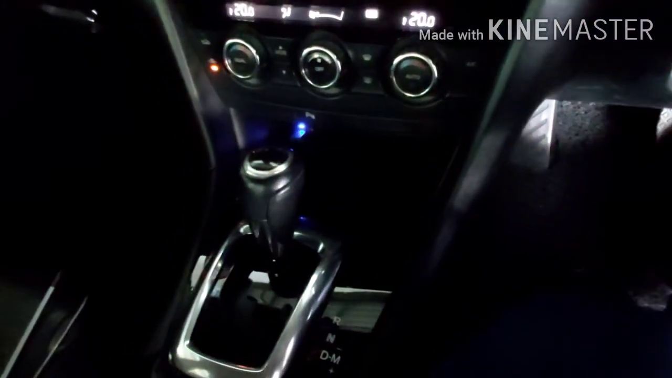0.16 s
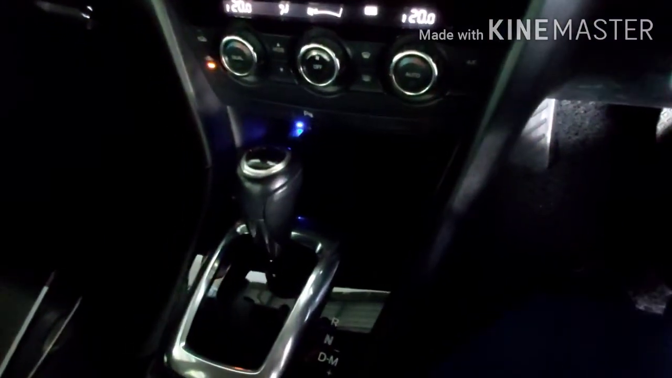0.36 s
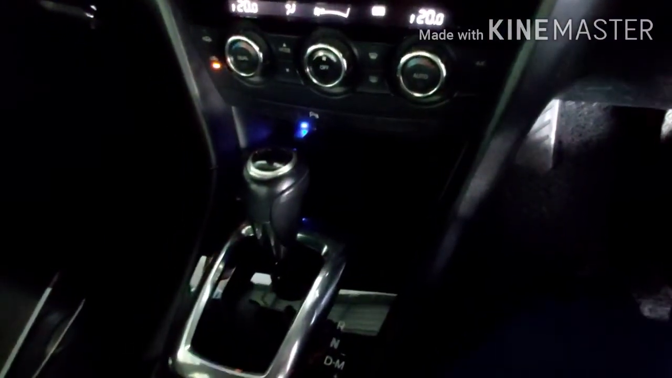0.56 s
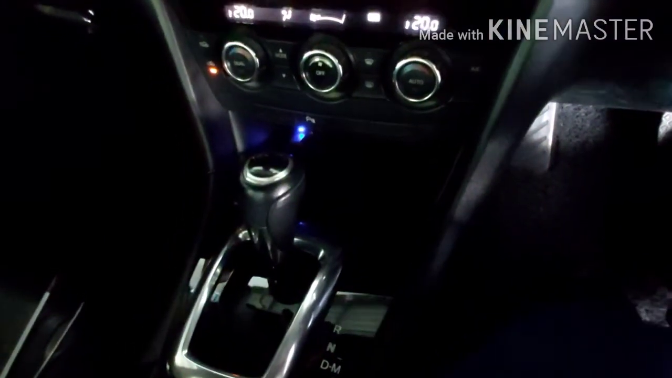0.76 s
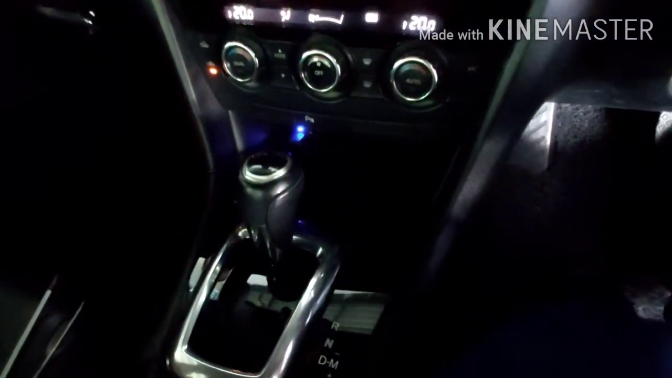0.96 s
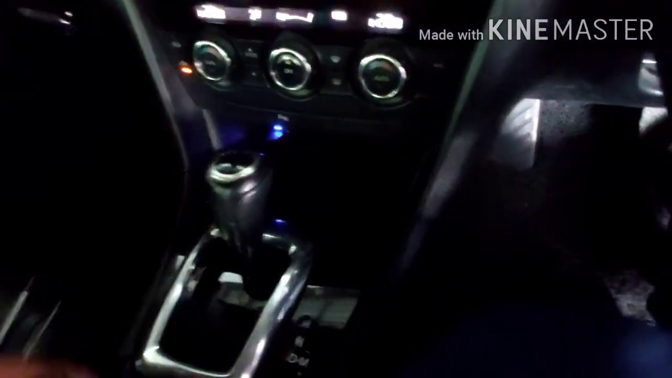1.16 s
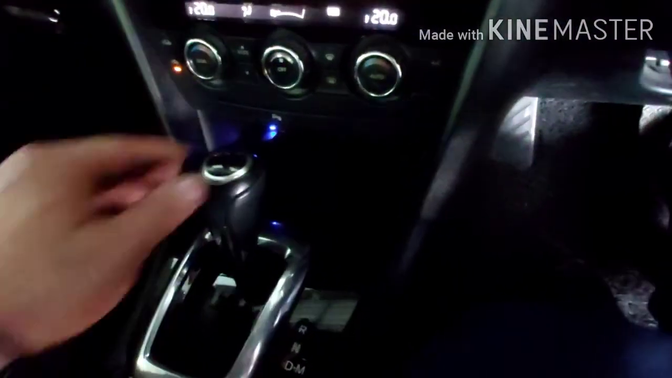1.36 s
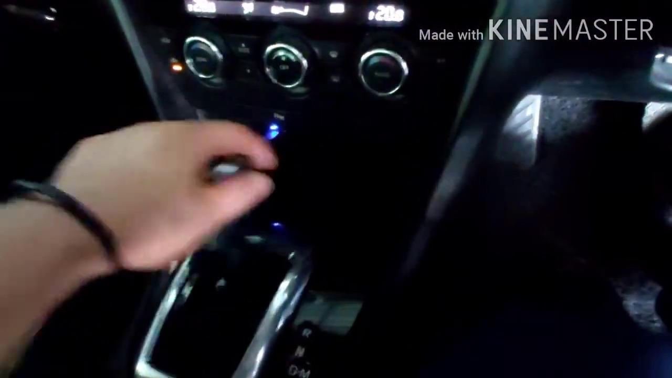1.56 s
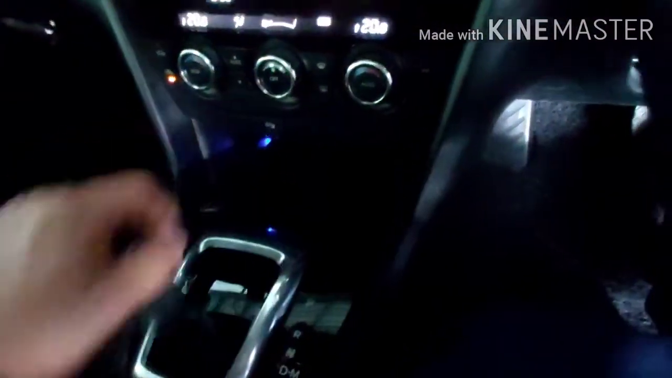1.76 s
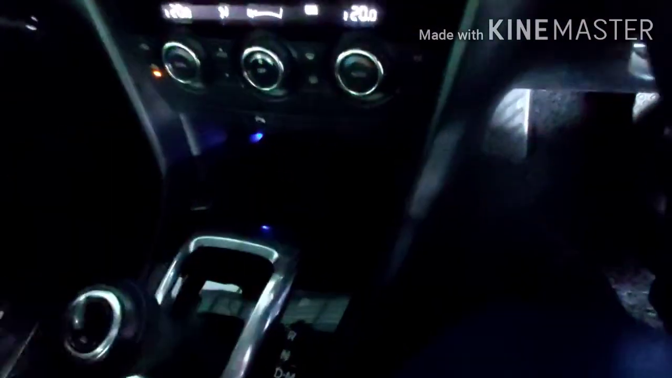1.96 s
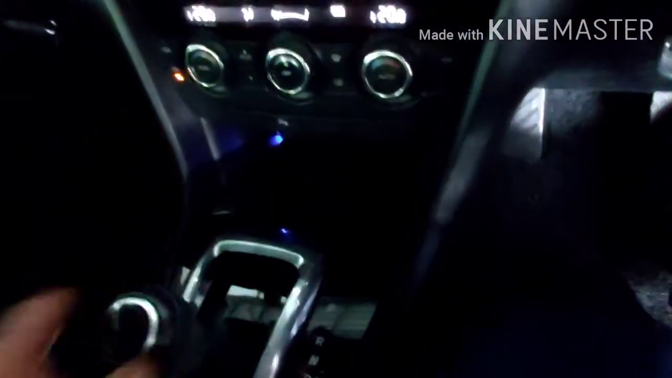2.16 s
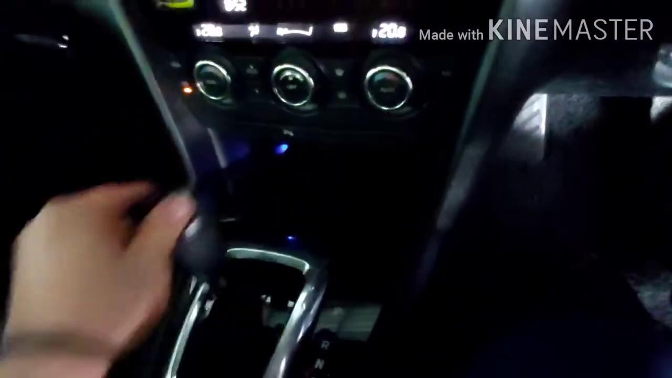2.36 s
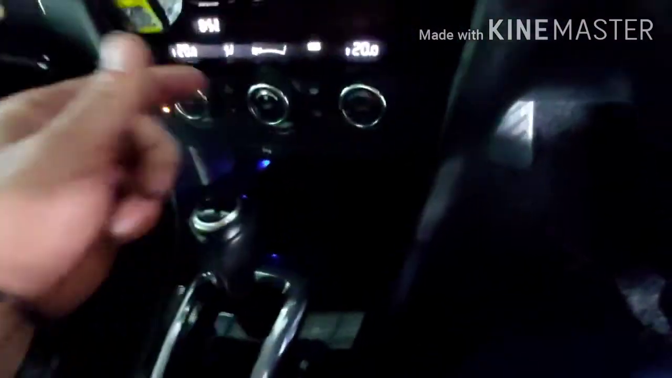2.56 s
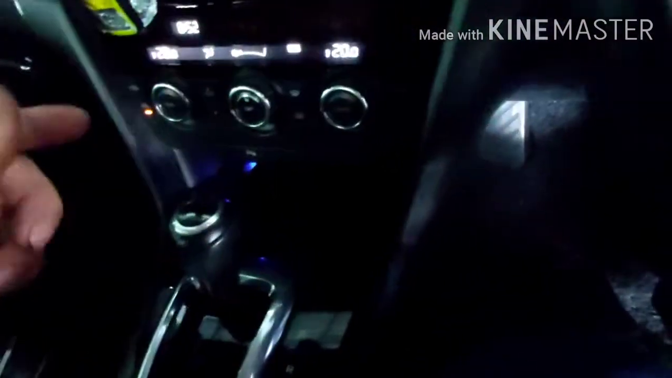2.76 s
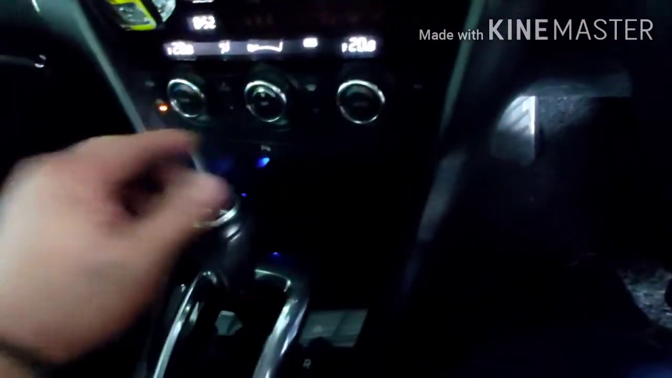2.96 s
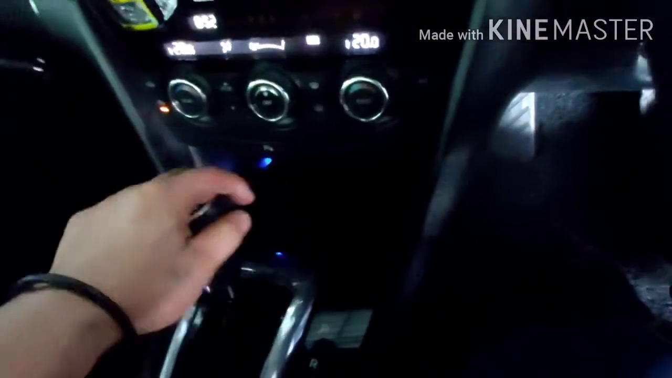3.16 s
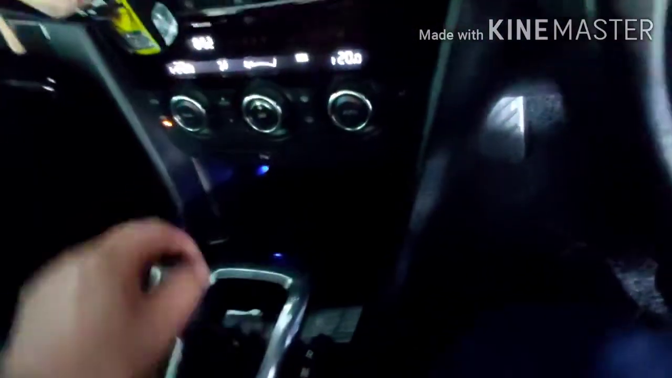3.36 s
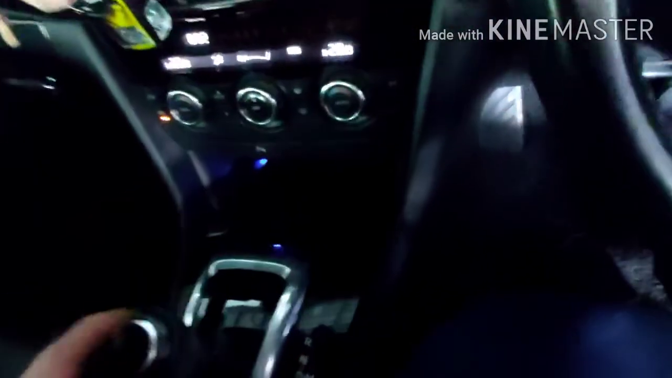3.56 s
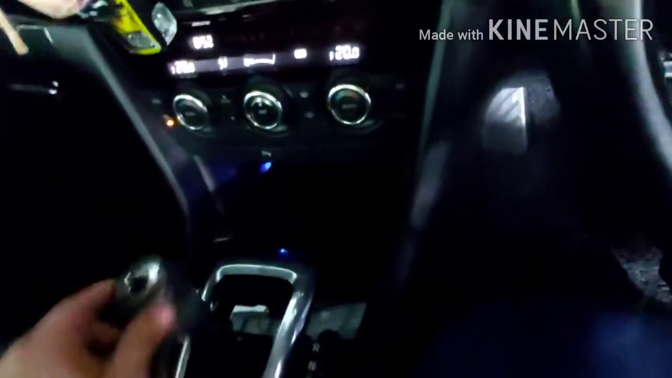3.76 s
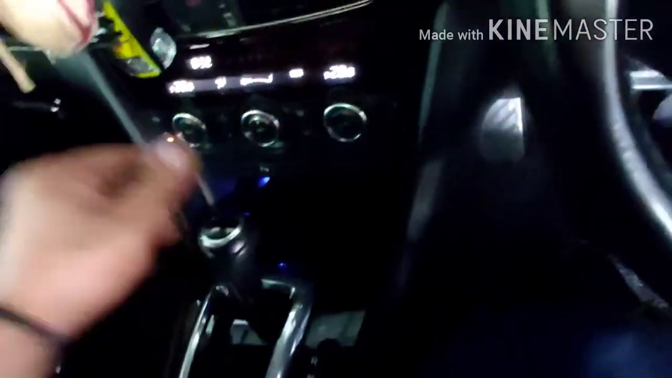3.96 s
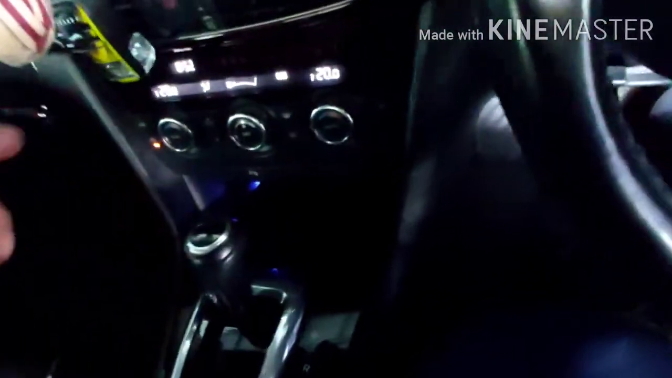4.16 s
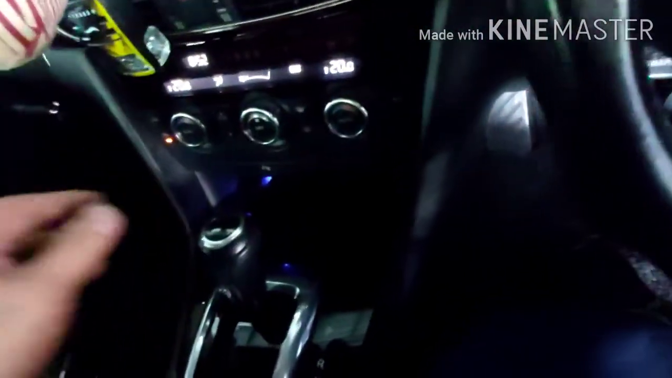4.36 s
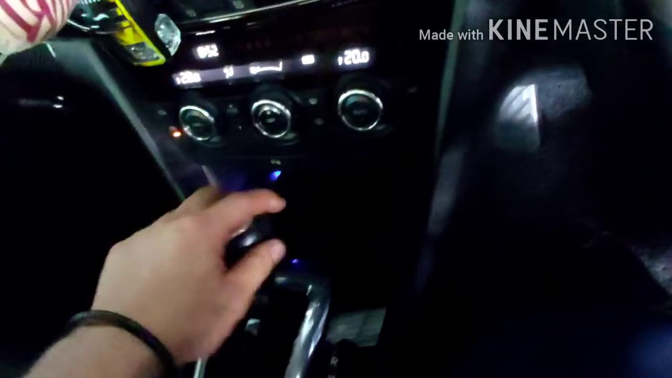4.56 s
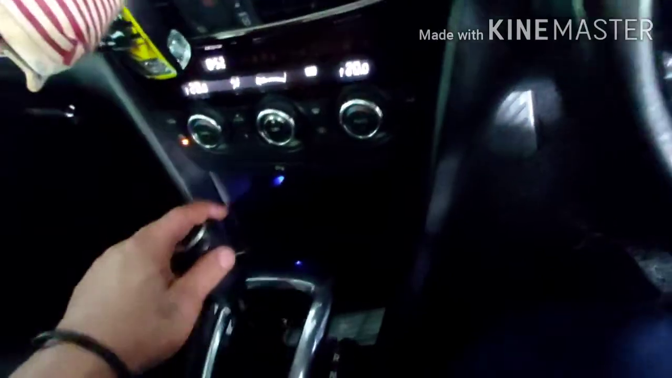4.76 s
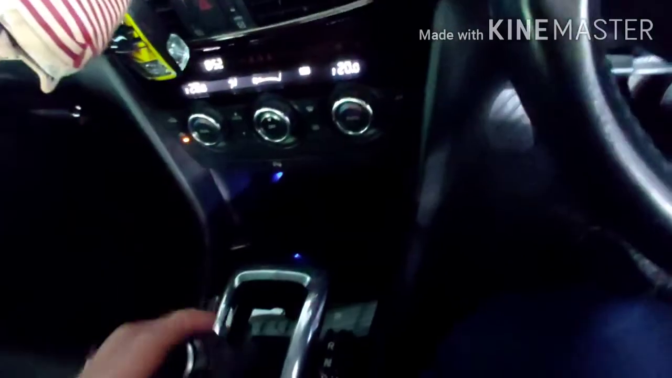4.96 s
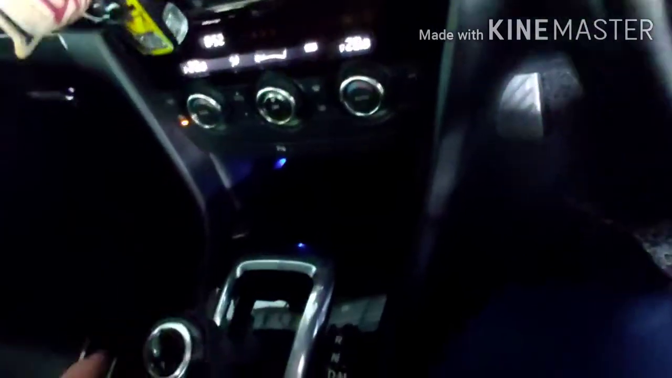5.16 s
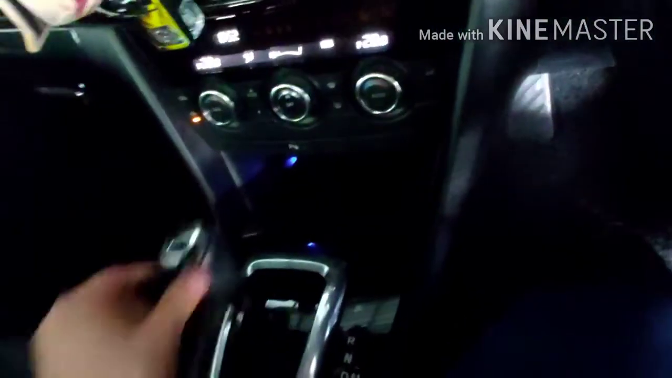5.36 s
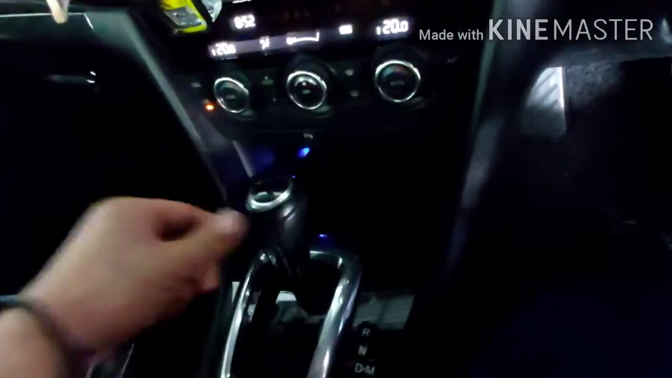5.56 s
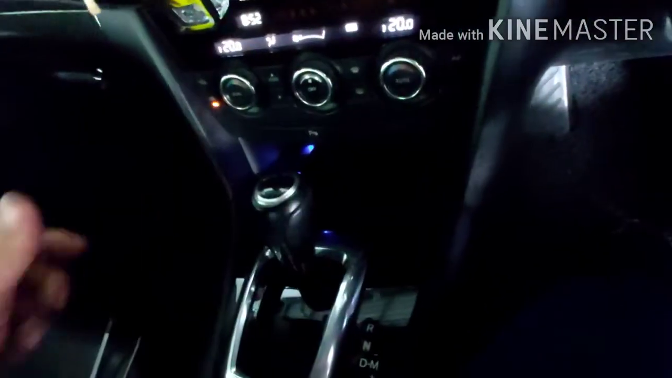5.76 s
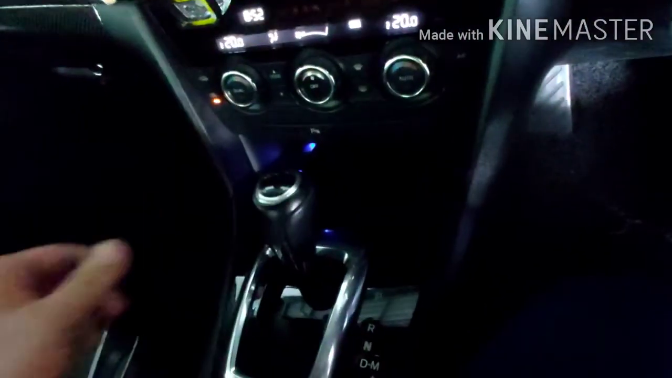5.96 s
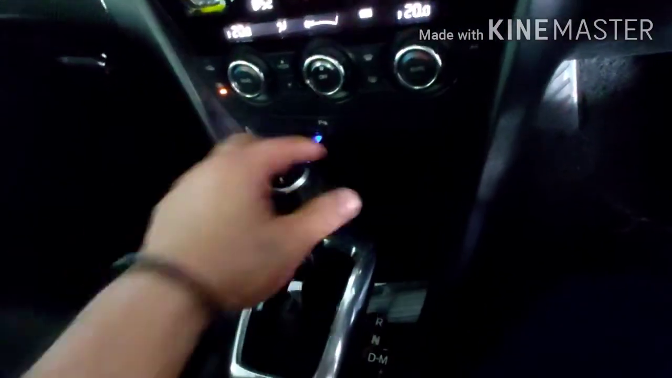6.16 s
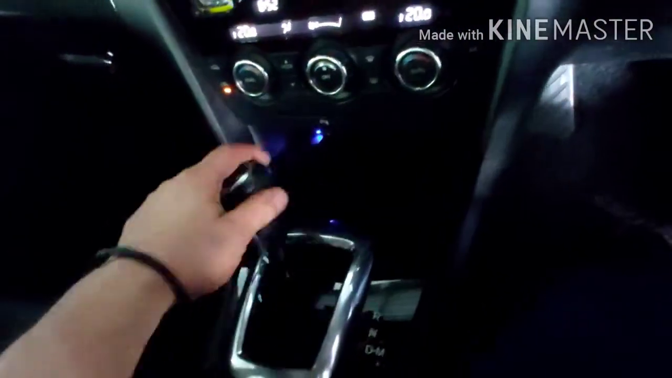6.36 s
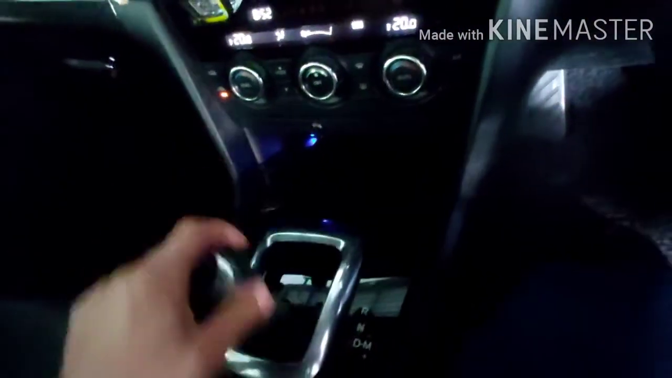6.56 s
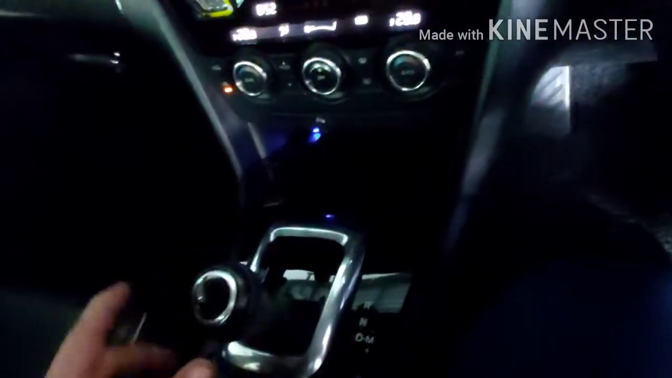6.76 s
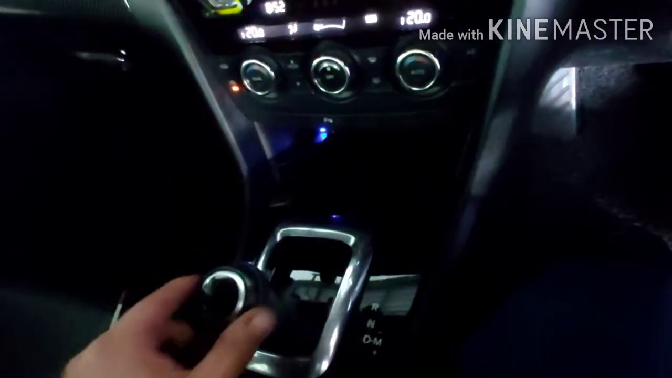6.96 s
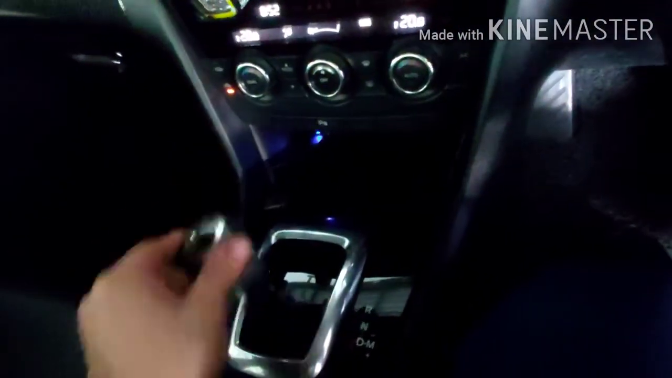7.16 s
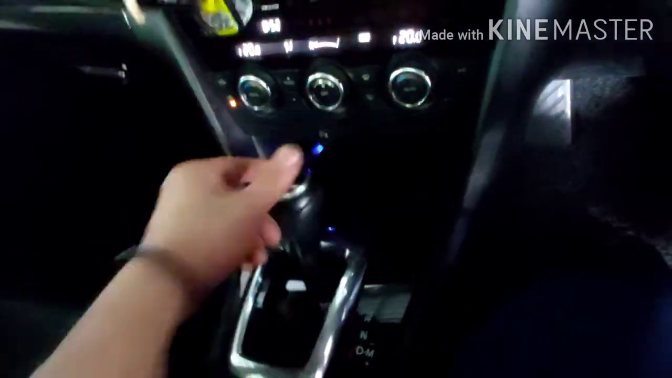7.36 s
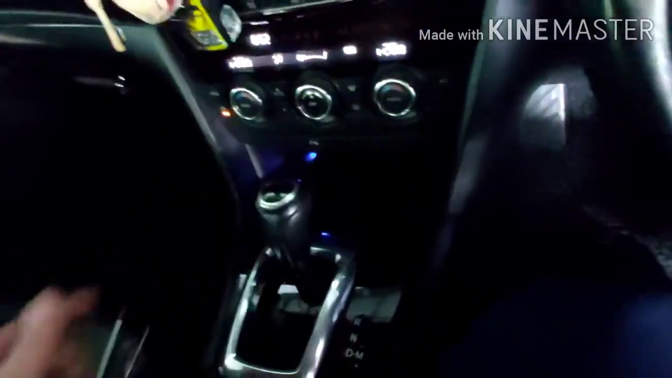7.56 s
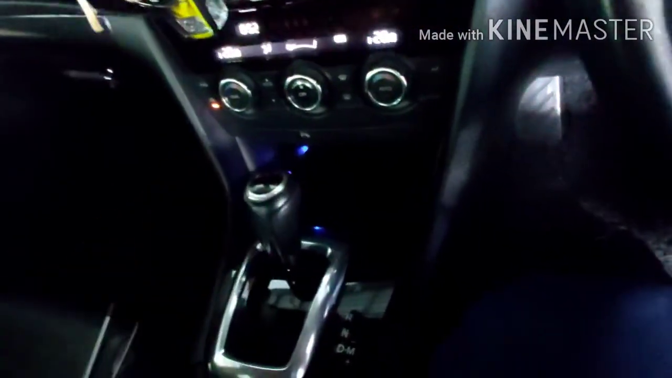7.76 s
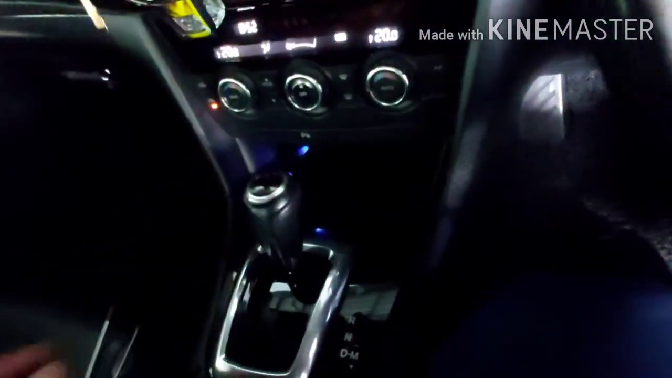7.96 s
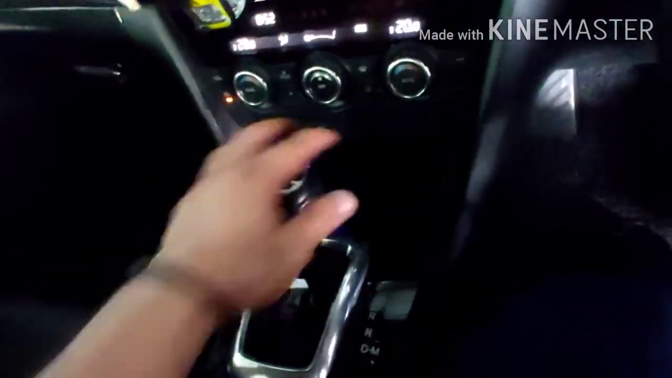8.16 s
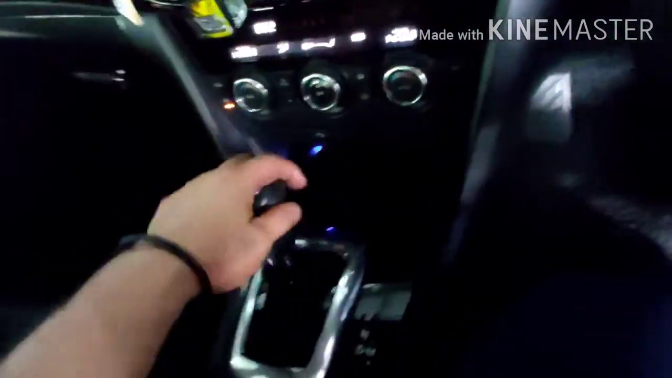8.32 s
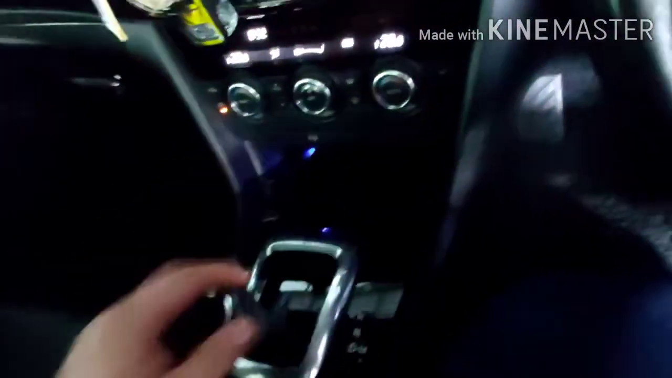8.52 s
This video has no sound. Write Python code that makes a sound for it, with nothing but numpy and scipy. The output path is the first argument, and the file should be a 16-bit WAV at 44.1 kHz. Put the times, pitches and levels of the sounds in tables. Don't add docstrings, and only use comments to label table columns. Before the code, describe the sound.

Close, dry stereo pickup in an upholstered car cabin: steady engine rumble and faint air hiss, then an automatic shifter worked back and forth. Each stroke is a fast cluster of rattling plastic clicks, hollow console knocks and low floor thumps, with brief scrapes between stops. Pulls finish in a dull slam. Small fingertip taps and loose button clicks come between strokes.

```python
import sys
import numpy as np
from scipy import signal
from scipy.fft import rfft, irfft
from scipy.io import wavfile
from scipy.ndimage import uniform_filter1d

SR = 44100
rng = np.random.default_rng(int(sys.argv[2]) if len(sys.argv) > 2 else 0)


def linear_from_db(decibels):
    return 10 ** (np.asarray(decibels, float) / 20)


def unload_wav(signal):
    wavfile.write(
        sys.argv[1],
        SR,
        np.round(np.clip(np.atleast_2d(signal).T, -1, 1) * 32767).astype(np.int16),
    )


N = 378819
SPAN = 8192
LN_60DB = np.log(1000)
SIDES = np.array([[1], [-1]])


def unit(x):
    return x / np.sqrt(np.mean(x ** 2))


def along(table, hz):
    f, v = np.transpose(table)
    return np.interp(np.log(np.maximum(hz, 1)), np.log(f), v)


def walk(rate_hz):
    k = int(SR / rate_hz)
    held = np.repeat(rng.standard_normal(N // k + 1), k)
    return 1.458 * uniform_filter1d(uniform_filter1d(held, k), k)[:N]


def add(out, hits, s):
    for hit, i in zip(hits, (s * SR).astype(int)):
        out[:, i:i + SPAN] += hit[:, :N - i]


# start in seconds, peak in dB,
# rebound delay in seconds, rebound peak in dB, thump in dB.
PULL = [(1.748, -14.5, .014, -8.5, -8), (1.798, -4.5, .029, -12, -8.5), (1.844, -4, 0.018, -21.5, -13),
        (3.361, -19.5, 0.018, -12.5, -14), (3.427, -4, 0.015, -20, -14), (3.465, -1.5, .015, -26, -6),
        (4.858, -19, 0.014, -11, -17), (4.913, -9, 0.03, -31, -19), (4.955, -5.5, 0.017, -21, -9.5),
        (6.492, -17.5, 0.019, -19.5, -17.5), (6.569, -4.5, 0.025, -24, -12),
        (6.618, -1, 0.022, -21.5, -7.5), (8.437, -20, .026, -17.5, -15), (8.51, -8, 0.027, -10.5, -7.5),
        (8.561, -4, 0.02, -21, -12)]
PUSH = [(2.278, -7.5, 0.047, -17, -9.5), (2.345, -7.5, 0.016, -25, -19), (2.434, -1, 0.035, -13, -11.5),
        (3.771, -7.5, 0.02, -17.5, -13.5), (3.814, -7.5, 0.022, -19.5, -14),
        (3.903, -6.5, .016, -14.5, -8.5), (5.331, -7, .017, -13.5, -9), (5.376, -10, .014, -13.5, -19),
        (5.455, -6, .016, -36, -7), (7.173, -8.5, 0.02, -17, -10.5), (7.219, -10, 0.015, -23, -23),
        (7.302, -2.5, 0.027, -21.5, -15)]


def notches():
    kind = np.concatenate([np.arange(len(PULL)) % 3, 3 + np.arange(len(PUSH)) % 3])
    return np.array(PULL + PUSH), kind


# knock, crack and tick in dB re click, rattle in ms.
NOTCH = [
    (-2.5, -18.5, -13, 13),
    (-13, -14.5, -24, 5.4),
    (-13.5, -15, -22.5, 3.96),
    (-13.5, -18.5, -27, 4.76),
    (-11.5, -16, -23, 8.8),
    (-10.5, -27.5, -29, 3.6),
]
# start in seconds, peak in dB.
LEAD_PULL = [(1.836, -20), (3.455, -9.5), (4.947, -7), (6.607, -12), (8.553, -19)]
# start in seconds, peak in dB.
LEAD_PUSH = [(2.42, -17.5), (3.887, -12), (5.442, -11.5), (7.291, -16.5)]
# knock, crack and tick in dB re click, rattle in ms.
LEAD_IN = [
    (-18, -24.5, -15, 9.4),
    (-20, -12, -17.5, 11.3),
]
# start in seconds, peak in dB,
# knock and crack in dB re click, rattle in ms.
LOOSE = [(1.558, -27, -6, -14, 9.3), (1.622, -17.5, -22, -12, 6.2), (1.648, -7, -18.5, -9.5, 2.23),
         (1.735, -19.5, -7, -14, 5.1), (1.81, -20, 0, -12, 6), (2.221, -25, -12, -19.5, 27),
         (2.246, -35.5, 5, -20, 3), (3.101, -35, -4, -8.5, 7.4), (3.965, -23, -11, -18.5, 6.6),
         (4.696, -25.5, -20, -19, 9.2), (4.727, -29, 2.5, -26, 3.8), (4.825, -28.5, -2.5, -19, 15),
         (5.262, -27.5, -6, -18, 33), (5.426, -30, -15, -18, 3.5), (3.762, -34, 5, -20, 5),
         (3.396, -44, 11, -15, 3.3), (4.89, -26, -12, -14, 5.1), (5.535, -18.5, -21, -12.5, 11),
         (5.572, -18, -13, -35, 6.3), (6.336, -30.5, -14, -3, 2.7), (6.361, -28, -1, -19, 3.5),
         (7.362, -15.5, -11.5, -25, 4), (8.36, -27, -29, -9, 2.5)]


def clicks():
    out = [(s, db, knock, crack, crack - 1.5, ms) for s, db, knock, crack, ms in LOOSE]
    for table, contact in zip((LEAD_PULL, LEAD_PUSH), LEAD_IN):
        out += [(*row, *contact) for row in table]
    rows, kind = notches()
    for (s, db, after_s, back_db, _), k in zip(rows, kind):
        out.append((s, db, *NOTCH[k]))
        knock_db = -15 - 0.55 * (back_db + 17.5)
        out.append((s + after_s, back_db, knock_db, -18.5, -24, 6))
    return out


def rattle(length_s, per_s, spread_db):
    t = np.arange(SPAN // 2) / SR
    u, e = rng.random((len(length_s), 2, len(t))).transpose(1, 0, 2)
    size = linear_from_db(spread_db * np.log(1 - np.abs(2 * e - 1) + 1e-9))
    contacts = (u < per_s / SR) * np.sign(e - .5) * size
    contacts[:, 20] = 2.6
    return contacts * (1 - np.exp(-t / 0.0016)) * np.exp(-(t / length_s[:, None]) ** 0.7)


def ring(modes, count, scatter_db, ports_db, detune):
    t = np.arange(SPAN // 4) / SR
    chance = rng.standard_normal((count, len(modes), 4))
    out = 0
    for k, (hz, db, t60) in enumerate(modes):
        a, b, c, d = chance[:, k].T[:, :, None, None]
        phase = SIDES * d * min(hz / 2500, 1)
        wave = np.sin(2 * np.pi * hz * (1 + detune * b) * t + phase)
        out = out + linear_from_db(db + scatter_db * a + ports_db * c * SIDES) * wave * np.exp(-LN_60DB * t / t60)
    return out


def burst(colour, count, alike):
    mid, side = rng.standard_normal((count, 2, 1, 512)).transpose(1, 0, 2, 3)
    pair = (mid * alike + side * SIDES) * np.exp(-np.arange(512) / SR / .0002)
    return irfft(rfft(pair) * linear_from_db(along(colour, np.fft.rfftfreq(512, 1 / SR))))


def strike(force, body, peak_db):
    hit = irfft(rfft(force[:, None], SPAN) * rfft(body, SPAN), SPAN)
    peak = np.abs(hit.mean(axis=1)).max(axis=1)
    return hit * (linear_from_db(peak_db) / peak)[:, None, None]


# frequency in Hz, level in dB, t60 in seconds.
PLASTIC = [(840, -13, .02), (1030, -14, .01), (1255, -3.5, .024), (1420, -5, .012), (1650, -3, .009),
           (1895, -1, .013), (2120, -5, .009), (2385, -5, .011), (2790, -9, .008), (3200, -11, .008),
           (3680, -14, .006), (4150, -16, .005)]
# frequency in Hz, level in dB, t60 in seconds.
CONSOLE = [(272, -31, 0.0061), (310.8, -1.5, 0.076), (408, -0.5, 0.03), (494, -5.5, 0.053)]
# frequency in Hz, level in dB.
CRACK = [(1800, -37), (2400, 5), (3200, 2), (4000, -6), (5000, -18.5), (6000, -15.5)]
# frequency in Hz, level in dB.
TICK = [(4000, 8), (5000, 10), (6200, -1), (8000, 9.5), (11000, 14.5), (14000, 9), (16000, -12)]


def detents():
    s, db, knock_db, crack_db, tick_db, ms = np.transpose(clicks())
    out, n = np.zeros((2, N)), len(s)
    chatter = rattle(np.clip(ms, 1, 30) / 1000, 1700, 3.14)
    snap = strike(chatter, ring(PLASTIC, n, 2.0, 1.5, .02), db - 2.5)
    crack = strike(chatter, burst(CRACK, n, 0.98), db + crack_db + 1.5)
    tick = strike(chatter, burst(TICK, n, 1.04), db + tick_db + 4.5)
    add(out, snap + (crack + tick) * linear_from_db(1.5 * SIDES), s)
    push = rattle(np.clip(1.6 * ms, 1, 40) / 1000, 400, 3.0)
    push = uniform_filter1d(push, 44, axis=1, origin=-22)
    add(out, strike(push, ring(CONSOLE, n, 2.5, 1.2, .02), db + knock_db + 7.0), s + .003)
    return out


# delay in seconds, pitch in Hz, t60 in seconds.
NOTCH_THUMP = [
    (0.00804, 122, .17),
    (0.0076, 129, 0.07),
    (0.0277, 136, 0.11),
    (0.0219, 120.7, 0.12),
    (0.0095, 120, 0.22),
    (0.0121, 105.5, .12),
]
# start in seconds, peak in dB,
# pitch in Hz, t60 in seconds.
HAND = [(1.818, -11, 138, 0.085), (1.557, -14.5, 113, 0.068), (1.647, -13, 157.6, 0.15),
        (2.477, -20, 173, .091), (3.264, -17.5, 95.5, 0.083), (3.969, -14, 99.4, .18),
        (4.577, -22, 110, 0.077), (4.724, -15, 143, 0.065), (5.542, -15, 118, 0.13),
        (5.581, -15.5, 148, 0.15), (6.235, -21, 124, 0.13), (6.363, -14.5, 149, .081)]


def landings():
    rows, kind = notches()
    after_s, hz, t60 = np.array(NOTCH_THUMP)[kind].T
    hz = hz * (1 + 0.085 * rng.standard_normal(len(hz)))
    s = np.minimum(rows[:, 0] + after_s, (N - 2) / SR)
    return HAND + list(zip(s, rows[:, -1], hz, t60))


def thumps():
    s, db, hz, t60 = np.transpose(landings())[:, :, None]
    t = np.arange(SPAN) / SR
    turn = rng.random((len(s), 2)) * 2 * np.pi
    swell = (1 - np.exp(-t / 0.0056)) ** 2 * np.exp(-LN_60DB * t / np.clip(t60, .03, .4))
    main = swell * np.sin(2 * np.pi * hz * t + turn[:, :1])
    lower = swell * np.sin(2 * np.pi * 0.632 * hz * t + turn[:, 1:])
    hit = main[:, None] + lower[:, None] * np.array([[.65], [.3]])
    gain = linear_from_db(db - 6.0) / np.abs(main).max(axis=1, keepdims=True)
    out = np.zeros((2, N))
    add(out, hit * gain[:, None], s[:, 0])
    return out


def end_stops():
    delay_s, peak_db, hz = .0205, -7, 125
    t = np.arange(N) / SR
    out = 0
    for row in PULL[2::3]:
        since = t - row[0] - delay_s
        swing = np.cos(2 * np.pi * hz * since - .5)
        out = out + linear_from_db(peak_db) * swing * np.exp(-((since - .001) * hz / 0.55) ** 2)
    return out


# start in seconds, peak in dB, pitch in Hz, t60 in seconds.
TAPS = [(1.116, -17.5, 1690, 0.0048), (1.512, -19.5, 1810, 0.007), (1.560, -24.5, 1244, 0.024),
        (3.102, -43, 1280, .04), (3.229, -34, 1430, 0.027), (3.267, -34.5, 1260, 0.037),
        (4.581, -36, 1290, 0.045), (4.697, -28, 1630, 0.013), (5.261, -31, 1260, 0.023),
        (5.534, -16.5, 1650, 0.014), (6.233, -40, 1230, .04), (6.336, -20, 1640, 0.0078),
        (7.171, -8.5, 1590, 0.0093), (7.363, -16, 1325, 0.022), (8.247, -31.5, 1260, 0.026),
        (8.360, -29.5, 1530, 0.023)]


def taps():
    s, db, hz, t60 = np.transpose(TAPS)[:, :, None]
    t = np.arange(SPAN) / SR
    decay = (1 - np.exp(-t / 0.00008)) * np.exp(-LN_60DB * t / t60)
    hit = linear_from_db(db) * np.sin(2 * np.pi * hz * t) * decay
    out = np.zeros((2, N))
    add(out, np.repeat(hit[:, None], 2, axis=1), s[:, 0])
    return out


# length in seconds, scrape in dB, change by its end in dB.
NOTCH_SLIDE = [
    (0.11, -40, -15.5),
    (0.018, -37, 2),
    (0.021, -39, -4.5),
    (0.039, -37, 1.5),
    (0.028, -43.5, 5),
    (0.078, -61, -4),
]


def scrape():
    t = np.arange(N) / SR
    rows, kind = notches()
    gain = np.zeros(N)
    for s, (length_s, db, fade_db) in zip(rows[:, 0], np.array(NOTCH_SLIDE)[kind]):
        end = s + length_s
        gain += np.interp(t, [s - .008, s, end, end + 0.013], [0, linear_from_db(db), linear_from_db(db + fade_db), 0])
    grains = (rng.random(N) < 2500 / SR) * rng.standard_normal(N) * gain * linear_from_db(3.0 * walk(90))
    bodies = [(ring(PLASTIC, 1, 0, 0.74, 0)[0], 12.0), (ring(CONSOLE, 1, 0, 0.48, 0)[0], 14.0),
              (burst(CRACK, 1, 0.93)[0], 2.5), (burst(TICK, 1, 0.14)[0], -4.0)]
    out = 0
    for body, db in bodies:
        body = body * linear_from_db(db) / np.sqrt(np.sum(body ** 2) / 2)
        out = out + signal.fftconvolve(grains[None], body, axes=1)[:, :N]
    return out


def cabin(x):
    t60, wet_db = .06, -10
    t = np.arange(SPAN) / SR
    tail = rng.standard_normal((2, SPAN)) * np.exp(-LN_60DB * t / t60) * (t > .001)
    tail = tail / np.sqrt(np.sum(tail ** 2, axis=1, keepdims=True))
    treble = signal.sosfilt(signal.butter(2, 500, "high", fs=SR, output="sos"), x)
    return x + linear_from_db(wet_db) * signal.fftconvolve(treble, tail, axes=1)[:, :N]


# multiple of firing rate, level in dB rms.
ORDERS_DB = [(1, -50), (2, -41.5), (3, -47), (4, -45.5), (5, -49.5), (6, -47.5), (8, -50.5), (9, -55.5)]


def engine(hum_db):
    firing_hz = 23.74
    phase = 2 * np.pi * np.cumsum(firing_hz * (1 + 0.011 * walk(1.5))) / SR
    lines = 0
    for k, db in ORDERS_DB:
        lines = lines + linear_from_db(db + 2.15 * walk(4.7)) * np.sin(k * phase + 2 * np.pi * rng.random())
    return np.sqrt(2) * lines * linear_from_db(hum_db - hum_db.mean())


# frequency in Hz, level in dB per Hz.
RUMBLE = [(12, -48), (20, -20), (36, -1), (70, 0), (92, -1.5), (196, -6.5), (227, -13.5), (250, -6.5),
          (320, -45), (550, -120)]
# frequency in Hz, level in dB per Hz.
AIR = [(250, -10), (303, -1), (444, -9), (550, -13.5), (1060, -19.5), (1400, -15.5), (2530, -20.5),
       (3300, -26.5), (4300, -28), (5500, -36.5), (6800, -36), (9000, -33.5), (12000, -33.5), (15500, -47)]
# frequency in Hz, left-right correlation.
LIKENESS = [(60, 0.96), (150, 0.92), (300, 0.76), (640, 0.24), (1400, -0.29), (3000, -0.011)]


def cabin_air(hum_db, vent_db, hiss_db):
    hz = np.fft.rfftfreq(N, 1 / SR)
    like = np.clip(along(LIKENESS, hz), -.99, .99)
    mid, side = rfft(rng.standard_normal((2, N)))
    pair = np.sqrt(1 + like) * mid + np.sqrt(1 - like) * side * SIDES
    # colour, from Hz, to Hz, level curve in dB, trim in dB, flicker in dB
    layers = [(RUMBLE, 15, 250, hum_db, -1.5, 2.0),
              (AIR, 250, 3500, vent_db, 2.5, 1.2),
              (AIR, 3500, 20000, hiss_db, 6.5, .8)]
    out = 0
    for colour, lo, hi, db, trim_db, flicker_db in layers:
        edges = np.geomspace(lo, hi, 5)
        shaped = pair * linear_from_db(along(colour, hz))
        part = 0
        for a, b in zip(edges, edges[1:]):
            band = irfft(shaped * (hz >= a) * (hz < b), N)
            part = part + band * linear_from_db(flicker_db * walk(9))
        out = out + unit(part) * linear_from_db(db + trim_db)
    return out


# centre in seconds, length in seconds,
# pitch in Hz, level in dB rms.
SQUEALS = [
    (.8, .06, 600, -52),
    (0.958, 0.1, 705, -53),
    (.95, .07, 2110, -57),
    (7.877, 0.14, 2600, -56),
]


def squeals():
    t = np.arange(N) / SR
    out = 0
    for s, span_s, hz, db in SQUEALS:
        tone = np.sin(2 * np.pi * hz * np.cumsum(1 + 0.0156 * walk(25)) / SR)
        out = out + linear_from_db(db + 7.0 * walk(33)) * np.exp(-((t - s) / span_s) ** 2) * tone
    return out


# time in seconds, hum in dB, stir of air and sleeve in dB.
IDLE = [(0, -40, 1), (.36, -36, 0.5), (.98, -35.5, 2), (1.4, -35, 5), (2.05, -38.5, -3.5), (2.6, -35, 0),
        (2.97, -41, -2), (3.15, -36, 2.5), (3.65, -35.5, 0.5), (4.4, -37.5, -2.5), (4.65, -34.5, 0.5),
        (5.85, -37.5, -2.5), (6.2, -35.5, 0.5), (6.8, -36, -2.5), (7.14, -35.5, 0), (7.5, -34, 0),
        (8.19, -37.5, -1.5), (8.35, -33, 2.5)]


def scene():
    vent_db, hiss_db, vent_per_stir = -45, -63.5, 0.48
    shudder_db, shudder_s = 11, 0.089
    right_db, right_lag_samples = 4, 6
    t = np.arange(N) / SR
    s, hum_db, stir_db = np.transpose(IDLE)
    ends = [row[0] for row in PULL[2::3] + PUSH[2::3]]
    shudder = sum((t > e) * np.exp(-np.abs(t - e) / shudder_s) for e in ends)
    hum_db = np.interp(t, s, hum_db) + shudder_db * shudder
    stir_db = np.interp(t, s, stir_db)
    lever = cabin(detents() + taps() + scrape()) + thumps() + end_stops()
    lever = np.array([lever[0], np.roll(lever[1], right_lag_samples)])
    air = cabin_air(hum_db, vent_db + vent_per_stir * stir_db, hiss_db + stir_db)
    return (lever + squeals() + engine(hum_db) + air) * linear_from_db(-.5 * SIDES * right_db)


def top_cut(x):
    return signal.sosfilt(signal.butter(12, 16440, fs=SR, output="sos"), x)


def record(dry):
    body = signal.sosfilt(signal.butter(2, 34, "high", fs=SR, output="sos"), dry)
    rounded = np.tanh(0.93 * body) / 0.91
    mix = signal.sosfilt(signal.ellip(8, .2, 60, 15600, fs=SR, output="sos"), rounded)
    return top_cut(mix)


dry = scene()
out = record(dry)
unload_wav(out)
```